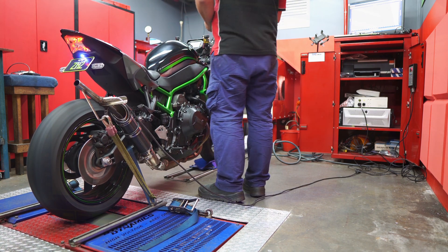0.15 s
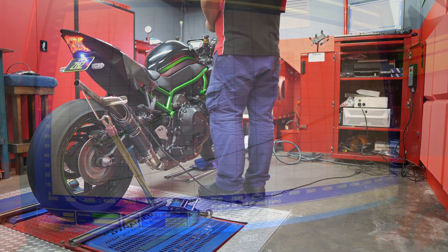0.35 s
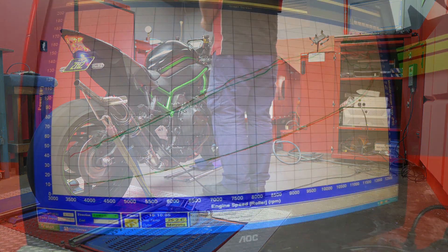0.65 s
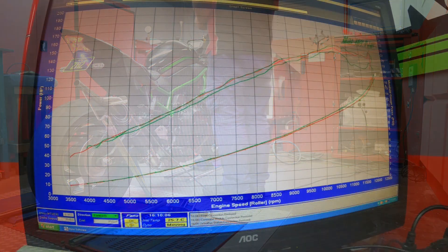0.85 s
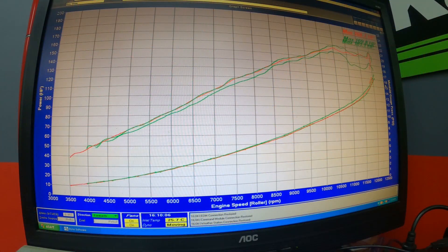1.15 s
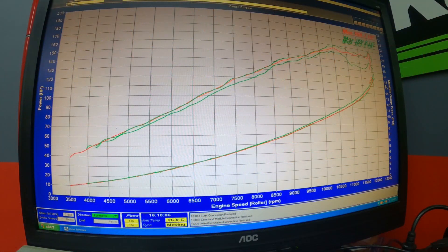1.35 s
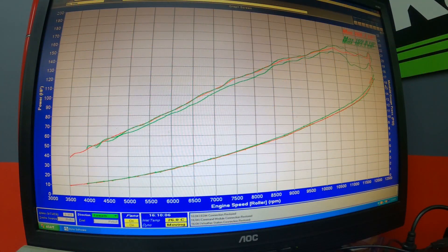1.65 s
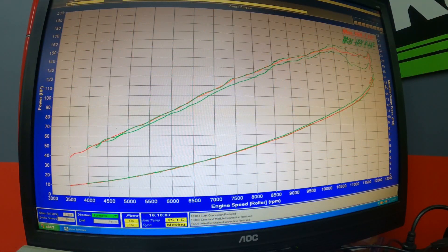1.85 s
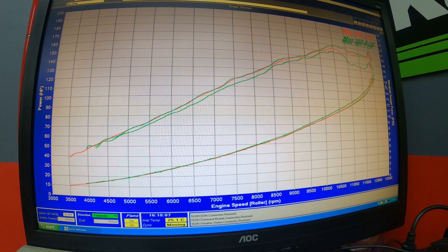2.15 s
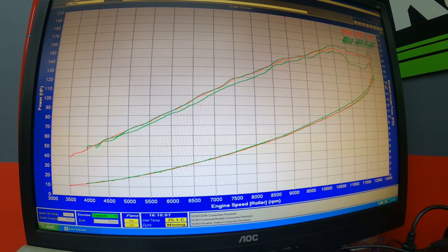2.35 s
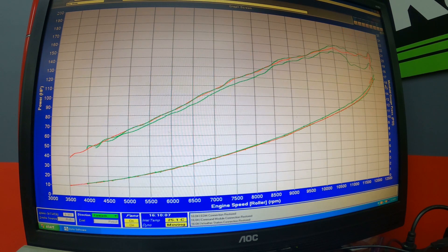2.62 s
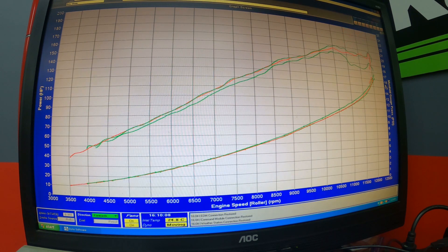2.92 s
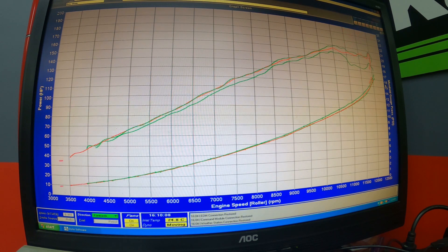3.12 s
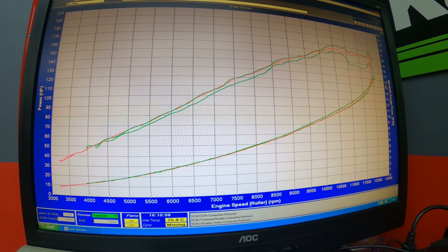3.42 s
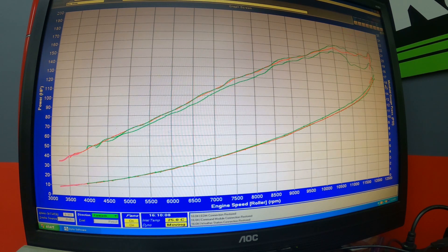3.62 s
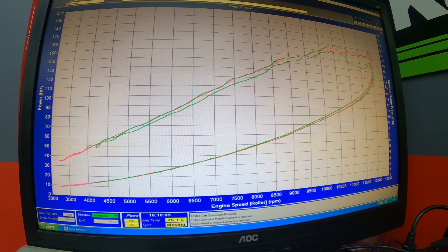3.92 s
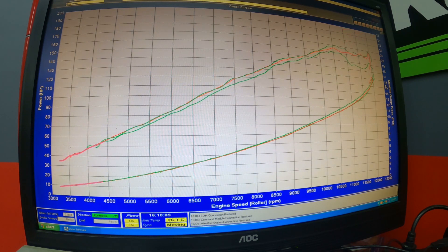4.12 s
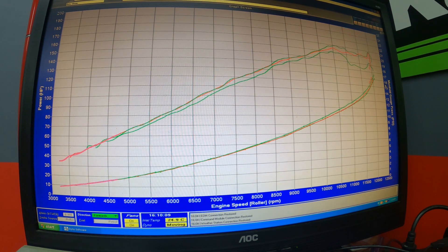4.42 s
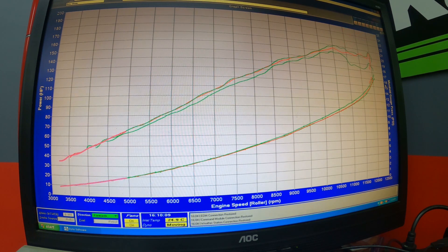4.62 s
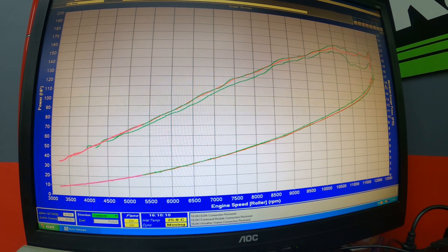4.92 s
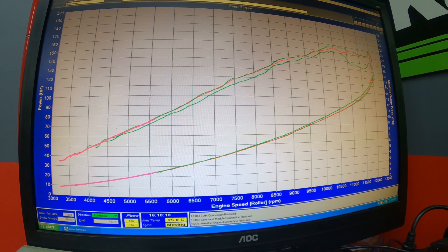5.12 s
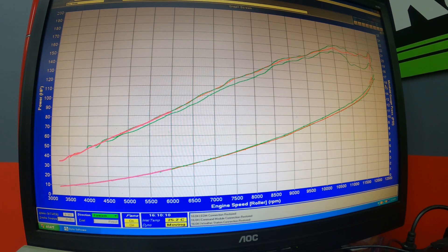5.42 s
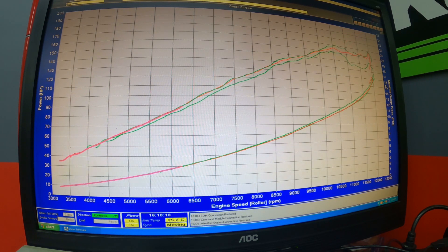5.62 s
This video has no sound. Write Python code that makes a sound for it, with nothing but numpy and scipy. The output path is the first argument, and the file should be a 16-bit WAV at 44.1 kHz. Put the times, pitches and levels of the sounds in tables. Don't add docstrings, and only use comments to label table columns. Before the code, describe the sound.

In a hard-walled workshop, a four-cylinder motorcycle on a rolling road winds down, close, wide and bright with a blower whistle. Within a second it cross-fades to a duller, nearly mono, farther microphone, where the engine picks up, wavers at part throttle, then pulls steadily upward with rough stumbles over tyre-on-drum rumble.

```python
import sys
import numpy as np
from scipy import signal
from scipy.io import wavfile
from scipy.ndimage import uniform_filter1d

SR = 44100
rng = np.random.default_rng(int(sys.argv[2]) if len(sys.argv) > 2 else 0)


def elevation(decibels):
    levels = np.asarray(decibels, float)
    return 10 ** (levels / 20)


def wav_record(signal):
    frames = np.transpose(np.atleast_2d(signal))
    bounded = np.clip(frames, -1, 1)
    quanta = np.round(bounded * 32767).astype(np.int16)
    wavfile.write(sys.argv[1], SR, quanta)


N = 254456
TIME_S = np.arange(N) / SR

# (middle [s], length [s], rise [dB])
DRUM_THUDS = [
    (.08, .2, -20),
    (.4, 0.6, 18),
    (.95, .35, 24),
    (1.25, 0.44, 21.5),
    (1.52, 0.34, 22.5),
    (1.95, 0.18, 8),
    (2.3, .5, 7),
    (3.3, .5, 13.5),
    (3.74, .4, 17),
    (5.05, .4, 9),
]
# (multiple of firing rate [-], level [dB rms])
COAST_ORDERS = [(1, -22.5), (1.5, -50), (2, -22.5), (2.5, -40.5), (3, -32), (3.5, -42.5), (4, -37),
                (5, -38), (6, -41.5), (7, -44.5), (8, -54.5), (9, -52.5), (9.5, -49.5), (12, -49.5),
                (15, -48)]
# (frequency [Hz], density [dB per Hz])
COAST_ROAR = [(30, -22.5), (100, 0.5), (300, 4.5), (700, 3), (1300, 6), (2500, 2), (5000, -3.5),
              (8000, -11.5), (12000, -13), (15600, -21.5)]
# (frequency [Hz], width [Hz], gain [dB])
CLOSE_PATH = [(167.3, 6, -12), (268, 10, -2.5), (344.2, 12.2, -22.5), (402, 55, -7.5), (465, 20, -14.5),
              (632, 21, -11), (690, 16, -15.5), (766, 30, -19), (1000, 26, 7.5), (1542, 53, 10)]
# (frequency [Hz], ratio [dB])
CLOSE_SIDE = [(60, -46), (200, -19), (400, -1), (900, -3.5), (2400, -4), (6000, 0.5), (12600, 1),
              (13600, -13.5), (15500, -20)]
FAR_SIDE = [(100, -70), (2600, -60), (3300, -43), (8000, -42), (10700, -47), (11200, -4), (13000, -2),
            (15000, -5)]
# (frequency [Hz], level [dB rms])
PIPE = [(40.0, -20.5), (70.0, -20.5), (130.0, -23), (200.0, -12.5), (300.0, -11), (450.0, -19),
        (700.0, -20.5), (1100.0, -23.5), (1600.0, -42.5), (2200.0, -48), (3000.0, -47)]
# (frequency [Hz], width [Hz], gain [dB])
ROOM_LOW = [(91.2, 3.9, -5.5), (121.4, 2.7, -11.5), (133.5, 4.1, -7), (133.6, 7, 10), (146, 29, -3.5),
            (185, 10, -4), (206.2, 9.3, 2), (215.4, 14, -5.5), (227, 6.2, -26.5), (254, 26, -10),
            (277.3, 16, -4.5), (293, 9.8, -1.5), (306.8, 2.4, -10.5), (308.4, 10, -1.5), (322, 25.2, -15.5),
            (335.1, 6.7, -23.5), (357, 27.5, -15), (369, 40, -0.5), (370, 25, -4.5), (393, 18, -4.5),
            (392, 5.8, 1.5), (405.7, 21, -5.5), (415.5, 5.5, -15), (441.5, 18.3, -7.5), (463.5, 120, -3.5),
            (471, 8.5, -15), (488.4, 11.1, -14), (511, 25, -20), (534.4, 6.8, 0), (547.6, 9.9, -25.5)]
ROOM_HIGH = [(568.7, 30, -11.5), (599, 31, -10.5), (627, 8.1, -1.5), (631, 5.6, -0.5), (663.5, 55, -17),
             (705.4, 22.8, -27), (710, 28, -4.5), (754.4, 47.6, -21), (834, 36, 1.5), (798.3, 15, -14.5),
             (836.5, 16, -7.5), (844, 61, -10), (875, 25, -4), (902, 71, -13), (938.4, 18, -13),
             (1009.4, 72, -21), (1082, 120, -6.5), (1058, 22, -0.5), (1149.5, 144, -7.5), (1174, 77, 0),
             (1205, 30.1, -9.5), (1210.4, 33, 10.5), (1300, 59, 0), (1270, 18, 1.5), (1268, 96, -6),
             (1391, 82.7, -12), (1579, 14, -11.5), (1570, 12, 7), (1730, 25.6, -2.5), (1830, 45, -5)]
# (frequency [Hz], width [Hz], gain [dB])
SILENCER = [(125, 11, -11), (170.4, 7.3, -2), (701, 47, 9), (802, 21, 1), (985, 33, 5), (1083, 13, 4),
            (1260.6, 22, 6.5), (1590, 45, 2.5), (1750, 53, 5), (718, 11, -7.5), (1022, 14, -7.5),
            (1165, 14, -9), (1390, 20, -6), (1694, 28, 4)]
# (frequency [Hz], width [Hz], gain [dB])
FLOOR_PANELS = [(59.7, 9, 12.5), (66, 6.5, 2.5), (77.5, 5, 12), (89.6, 8.1, 8.5)]
# (frequency [Hz], density [dB per Hz])
PULL_ROAR = [(30, -9.5), (100, 0), (250, 17), (1000, 21), (1500, 12.5), (2000, 6), (3000, 3), (4300, -2),
             (5000, -9), (7100, -15), (8000, -16), (10500, -26), (15100, -33), (15350, -54.5)]
# (frequency [Hz], density [dB per Hz])
BURBLE = [(30, -41), (70, -23.5), (140, -6), (260, 7), (450, -5), (800, -20.5), (2000, -41), (8000, -70)]
# (multiple of firing rate [-], start [s], end [s], width [Hz], level [dB])
WHINES = [
    (143, .8, 1.45, 400, -70),
    (25, 1.0, 1.95, 30, -52),
    (25.2, 1.47, 1.58, 25, -49),
    (65, 1.62, 1.76, 60, -66),
    (65, 5.22, 5.52, 450, -75),
    (69, 1.6, 2.9, 500, -71),
]
# (time [s], firing rate [Hz])
FIRING_RATE = [(0, 82), (.8, 82.7), (1.1, 83.1), (1.28, 84.8), (1.41, 88.2), (1.7, 101.4), (1.8, 104),
               (1.95, 101.8), (2.18, 106.6), (2.41, 99.2), (2.52, 99.6), (2.66, 101.6), (2.88, 102.9),
               (3.48, 118), (3.9, 134.6), (4.2, 147.2), (5.1, 183.8), (5.77, 211.3)]
# (time [s], gain [dB])
EFFORT = [(0, -22.5), (.5, -11.5), (1.02, -6.5), (1.46, -2.5), (1.68, -5.5), (2.0, -4.5), (2.23, -2),
          (2.36, -5.5), (2.9, -4.5), (3.3, 2.5), (3.66, 1.5), (3.9, 0), (4.21, -3), (4.45, 1), (4.65, 3.5),
          (4.76, 7.5), (4.87, 3), (5.77, 0.5)]
# (multiple of firing rate [-], level [dB])
PULL_ORDERS = [(1.0, 0.93), (2.0, 6), (3.0, 6.5), (4.0, 4), (5.0, 3), (6.0, 1.5), (7.0, -1.5), (8.0, -1.5),
               (9.0, -3.5), (10.0, -7.5), (11.0, -6), (12.0, -7), (13.0, -16.5), (14.0, -9), (0.5, -28.5),
               (1.5, -24.5), (2.5, -19), (3.5, -23), (4.5, -18.5), (5.5, -14.5), (6.5, -12), (7.5, -19.5),
               (8.5, -16.5), (9.5, -14)]
# (middle [s], length [s], rise [dB])
STUMBLES = [
    (1.05, .6, 4.5),
    (1.5, 0.34, 4),
    (2.34, 0.11, 3.5),
    (3.3, 0.38, 9),
    (3.7, .4, 8),
    (3.99, 0.28, 10),
    (4.15, 0.34, 9.5),
    (4.41, 0.59, 13),
    (4.66, 0.32, 17),
    (4.92, 0.55, 15),
]
# (middle [s], length [s], rise [dB])
SURGES = [(.3, .6, 4), (1.1, 0.65, 2), (1.68, 0.42, -2.5), (1.92, 0.23, 0.5), (2.5, .3, -2),
          (3.22, 0.23, 2), (3.55, 0.49, -2.5), (3.88, 0.37, -6), (4.1, 0.26, -4.5), (4.43, .2, 1.5),
          (5.08, 0.34, 2.5)]


def evened(x):
    return x / np.sqrt(np.mean(x ** 2) + 1e-20)


def read(points, hz):
    f, value = np.transpose(points)
    return np.interp(np.log(hz + 1), np.log(f + 1), value)


def curve(rows):
    time_s, value = np.transpose(rows)
    return np.interp(TIME_S, time_s, value)


def bumps_db(rows):
    return sum(db * np.cos(np.pi * np.clip((TIME_S - s) / length, -.5, .5)) ** 2 for s, length, db in rows)


def peaks_db(rows, hz):
    return sum(db / (1 + (2 * (hz - f) / width) ** 2) for f, width, db in rows)


def wander(hz, count):
    hop = 64
    steps = rng.standard_normal((count, N // hop + 2))
    slow = signal.lfilter(*signal.butter(2, hz * 2 * hop / SR), steps)
    at = np.arange(N) / hop
    return np.array([np.interp(at, np.arange(len(row)), evened(row)) for row in slow])


def resonate(x, hz, width_hz):
    turn = np.exp(2j * np.pi * np.cumsum(hz * np.ones(len(x))) / SR)
    r = np.exp(-np.pi * width_hz / SR)
    return 2 * (turn * signal.lfilter([1 - r], [1, -r], x / turn)).real


def noise(colour_db, side, patchy_db):
    frames, hz = N // 256 + 5, np.fft.rfftfreq(1024, 1 / SR)
    a, b, c, d, patches = rng.standard_normal((frames, 513, 5)).T
    patches = uniform_filter1d(patches, size=14, axis=0)
    patches = evened(uniform_filter1d(patches, size=10, axis=1))
    mid = a + 1j * b
    wide = (c + 1j * d) * elevation(read(side, hz))[:, None]
    z = np.array([mid + wide, mid - wide]) * elevation(colour_db(hz)[:, None] + patchy_db * patches)
    return evened(signal.istft(z, nperseg=1024, noverlap=768)[1][:, :N])


def rollers():
    lumps = resonate(resonate(rng.standard_normal(N), 54, 22), 54, 30)
    return elevation(-56.5 + bumps_db(DRUM_THUDS)) * evened(lumps)


def coast_orders(firing_hz):
    turns, grid_hz = np.cumsum(firing_hz) / SR, np.arange(3000.)
    path_db = peaks_db(CLOSE_PATH, grid_hz)
    lines = np.zeros(N)
    for (k, db), shake_db in zip(COAST_ORDERS, 1.2 * wander(hz=9, count=len(COAST_ORDERS))):
        level = elevation(db + np.interp(k * firing_hz, grid_hz, path_db) + shake_db)
        lines += np.sqrt(2) * level * np.cos(2 * np.pi * (k * turns + rng.random()))
    return lines


def coast_roar(firing_hz):
    throb = 1 + .25 * np.cos(2 * np.pi * np.cumsum(firing_hz) / SR)
    return elevation(-30) * throb * noise(lambda hz: read(COAST_ROAR, hz), CLOSE_SIDE, patchy_db=0.1)


def blower(firing_hz):
    hz = 72.2 * firing_hz
    one, two = [evened(resonate(resonate(row, hz, 380), hz, 450)) for row in rng.standard_normal((2, N))]
    whistle = elevation([[-43], [-49]]) * np.array([one, 0.6 * one + .7 * two])
    return whistle * elevation(1.5 * wander(hz=12, count=1))


def coast():
    start_hz, rest_hz, sag_s = 172.2, 80, 1.95
    firing_hz = rest_hz + (start_hz - rest_hz) * np.exp(-TIME_S / sag_s)
    return elevation(-1.5) * (coast_orders(firing_hz) + coast_roar(firing_hz) + blower(firing_hz))


def whines(firing_hz):
    out = np.zeros(N)
    for k, start_s, end_s, width_hz, db in WHINES:
        swell = np.sin(np.pi * np.clip((TIME_S - start_s) / (end_s - start_s), 0, 1))
        hz = np.minimum(k * firing_hz, 16000)
        whistle = resonate(resonate(rng.standard_normal(N), hz, width_hz), hz, width_hz)
        out += elevation(db) * swell * evened(whistle)
    return out


def room_db(hz):
    return peaks_db([*ROOM_LOW, *ROOM_HIGH, *SILENCER], hz)


def pull_roar(turns, gain_db, lug, surge_db):
    shut_db = -5.5
    roar_db = -34.5 + 0.5 * np.maximum(gain_db, shut_db) + 2.5 * lug + surge_db
    throb = (1 + 0.05 * np.cos(2 * np.pi * turns)) * elevation(0.5 * wander(hz=14, count=1))
    roar = noise(lambda hz: read(PULL_ROAR, hz) + 0.37 * room_db(hz), FAR_SIDE, patchy_db=0.72)
    return elevation(roar_db) * throb * roar


def burble(turns, lug, stumble_db):
    burble_db = -45.5 + 12.5 * lug + 0.73 * stumble_db
    puffs = 1 + .4 * np.cos(np.pi * turns)
    gas = noise(lambda hz: read(BURBLE, hz) + 0.33 * room_db(hz), FAR_SIDE, patchy_db=-2.0)
    return elevation(burble_db) * puffs * gas


def crank(turns, firing_hz, lug):
    crank_db = -53.5 + 3 * lug + peaks_db(FLOOR_PANELS, firing_hz / 2)
    return np.sqrt(2) * elevation(crank_db) * np.cos(np.pi * turns)


def path_lag(path_db):
    log_gain = np.log(elevation(path_db))
    lag = -signal.hilbert(np.r_[log_gain, log_gain[:0:-1]]).imag[:len(path_db)]
    return lag + np.cumsum(uniform_filter1d(rng.normal(0, .12, len(path_db)), size=40))


def pull_orders(turns, firing_hz, gain_db, lug, stumble_db, surge_db):
    grid_hz = np.arange(0, 4000, .5)
    path_db = read(PIPE, grid_hz) + room_db(grid_hz)
    lag = path_lag(path_db)
    uneven_db = -4.5 + 6.5 * lug + stumble_db
    rasp_db = 0.072 * surge_db + 0.18 * np.log2(firing_hz / 120)
    orders = [row for row in PULL_ORDERS if row[0] >= 1]
    lines = np.zeros(N)
    for (k, db), shake in zip(orders, wander(hz=11.3, count=len(orders))):
        half = k % 1 > 0
        rough_db = min(.4 * k - .3, 3.2) + 1.4 * half
        drive_db = uneven_db if half else gain_db
        heard_db = db + drive_db + np.interp(k * firing_hz, grid_hz, path_db)
        level = elevation(heard_db + rough_db * shake + k * rasp_db)
        phase = 2 * np.pi * k * turns + np.interp(k * firing_hz, grid_hz, lag) + 0.044 * k * shake
        lines += np.sqrt(2) * level * np.cos(phase)
    return lines


def pull():
    firing_hz = uniform_filter1d(curve(FIRING_RATE), size=3000)
    turns = np.cumsum(firing_hz * (1 + 0.0009 * wander(hz=19, count=1)[0])) / SR
    lug = np.clip((92 - firing_hz) / 8, 0, 1)
    gain_db, stumble_db, surge_db = curve(EFFORT), bumps_db(STUMBLES), bumps_db(SURGES)
    lines = crank(turns, firing_hz, lug)
    lines = lines + pull_orders(turns, firing_hz, gain_db, lug, stumble_db, surge_db)
    lines = lines * elevation(1.6 * lug * wander(hz=24, count=1)[0])
    gas = pull_roar(turns, gain_db, lug, surge_db) + burble(turns, lug, stumble_db)
    return lines + gas + whines(firing_hz)


def scene():
    fade_out_s, fade_in_s = 1.057, 0.77
    leave = np.clip(1 - TIME_S / fade_out_s, 0, 1)
    come = np.clip(TIME_S / fade_in_s, 0, 1)
    return rollers() + leave * coast() + come * pull()


def band_limit(x):
    return signal.sosfilt(signal.butter(12, 15610, fs=SR, output="sos"), x)


def record(dry):
    knee = .68
    mix = knee * np.tanh(elevation(0.42) * dry / knee)
    return band_limit(mix)


dry = scene()
out = record(dry)
wav_record(out)
```